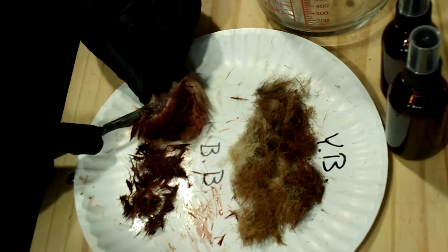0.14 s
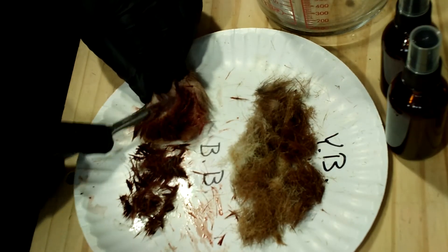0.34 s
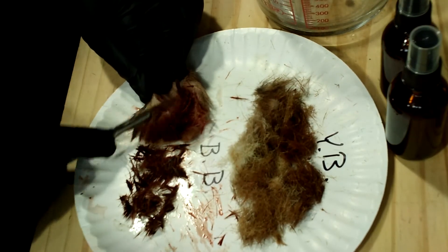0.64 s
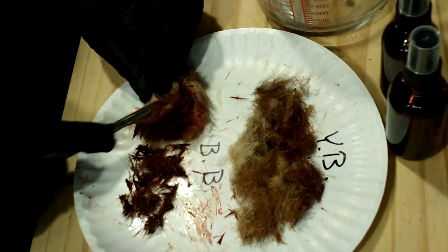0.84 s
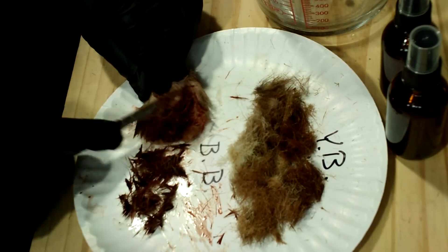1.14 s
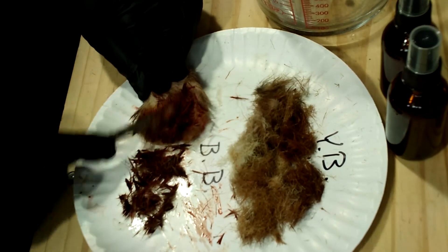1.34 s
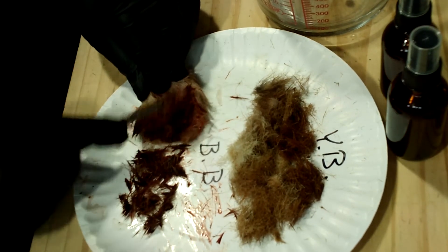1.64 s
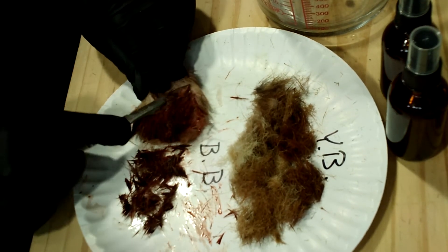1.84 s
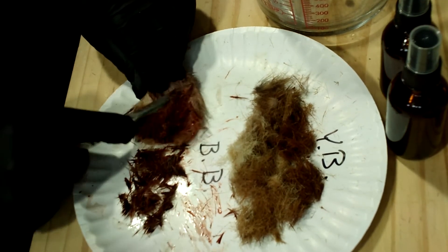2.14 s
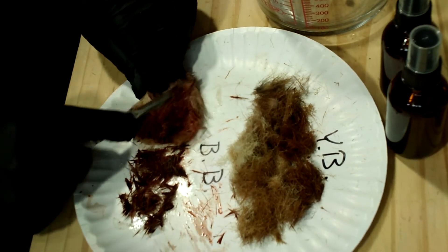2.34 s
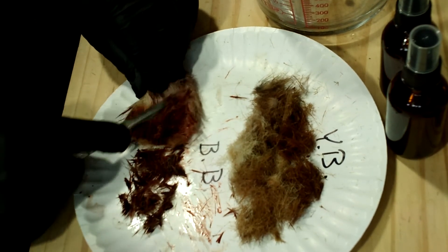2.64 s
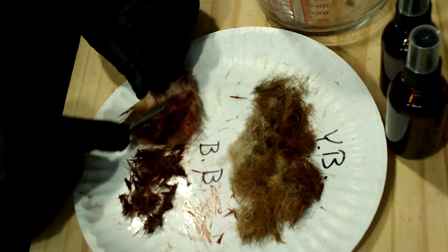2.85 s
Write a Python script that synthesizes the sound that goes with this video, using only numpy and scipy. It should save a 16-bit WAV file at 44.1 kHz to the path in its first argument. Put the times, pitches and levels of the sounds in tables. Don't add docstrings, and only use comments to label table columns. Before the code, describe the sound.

A small blade scrapes through damp hair over a paper plate, ten quick crisp strokes at a steady pace, with tiny snaps and rustles between them; close microphone, small quiet room, low hum and faint hiss.

```python
import sys
import numpy as np
from scipy import signal
from scipy.fft import rfft, irfft, next_fast_len
from scipy.io import wavfile
from scipy.ndimage import map_coordinates

SR = 44100
rng = np.random.default_rng(int(sys.argv[2]) if len(sys.argv) > 2 else 0)


def master_out(mix):
    frames = np.transpose(np.atleast_2d(mix))
    ceiling = np.clip(frames, -1, 1)
    pcm = np.round(ceiling * 32767).astype(np.int16)
    wavfile.write(sys.argv[1], SR, pcm)


def to_linear_factor(level_db):
    exponent = np.asarray(level_db, float) / 20
    return 10 ** exponent


N = 132300
T = np.arange(N) / SR


def unit(x):
    return x / np.sqrt(np.mean(x ** 2) + 1e-20)


def wobble(rate_hz):
    knots = rng.standard_normal(int(N * rate_hz / SR) + 4)
    return map_coordinates(knots, [T * rate_hz])


def gain(points, hz):
    f, db = np.transpose(points)
    f = np.r_[f[0] / 2, f, f[-1] * 2]
    db = np.r_[db[0] - 40, db, db[-1] - 40]
    return to_linear_factor(np.interp(np.log(hz + 1), np.log(f), db))


def peaks(rows, hz):
    return sum(to_linear_factor(db) / (1 + (2 * (hz - centre) / width) ** 2) for centre, width, db in rows)


def coloured(x, size_of):
    m = 2 * next_fast_len(N // 2 + 4096)
    size = size_of(np.fft.rfftfreq(m, 1 / SR))
    cepstrum = irfft(np.log(size + 1e-6), m)
    cepstrum[1:m // 2] *= 2
    cepstrum[m // 2 + 1:] = 0
    y = irfft(rfft(x, m) * np.exp(rfft(cepstrum)), m)[:N]
    return y / np.sqrt(np.mean(size ** 2))


# (frequency [Hz], density [dB per Hz])
HUM_SPECTRUM = [(12, -15.5), (20, -0.5), (66, 0), (382, -16.5), (458, -19.5), (608, -22.5), (686, -23),
                (1010, -26.5), (2500, -35), (3250, -60), (5500, -120)]
# (frequency [Hz], density [dB per Hz])
HISS_SPECTRUM = [(1200, -22.5), (2500, -7), (4000, -5.5), (4850, 3), (5800, -7.5), (9000, -9), (15500, -11)]
HUM_DB, HISS_DB = -56.5, -68.5
WHINE_HZ, FLIPS_PER_S, FIRST_FLIP_S, WHINE_DB = 7867.13, 59.94, .0086, -77.5


def room():
    hum_level = to_linear_factor(HUM_DB + 1.0 * wobble(3.04))
    hum = hum_level * coloured(rng.standard_normal(N), lambda hz: gain(HUM_SPECTRUM, hz))
    hiss = to_linear_factor(HISS_DB) * coloured(rng.standard_normal(N), lambda hz: gain(HISS_SPECTRUM, hz))
    flip = np.clip(8 * np.sin(np.pi * FLIPS_PER_S * (T - FIRST_FLIP_S)), -1, 1)
    whine = np.sqrt(2) * to_linear_factor(WHINE_DB) * flip * np.sin(2 * np.pi * WHINE_HZ * T)
    return hum + hiss + whine


def walls(x):
    t = T[:SR // 4]
    tail = rng.standard_normal(len(t)) * to_linear_factor(-60 * t / 0.16)
    echo = np.pad(tail / np.linalg.norm(tail), (150, 0))
    return to_linear_factor(-15) * signal.fftconvolve(x, echo)[:N]


# (start [s], length [s], level [dB])
HAND_RUSTLES = [(0.1, 0.046, -66), (0.216, 0.027, -53), (0.368, 0.044, -58), (0.451, 0.064, -58),
                (1.487, 0.072, -62), (2.18, 0.01, -58.5), (2.347, .017, -48.5), (0.21, 0.04, -64),
                (0.94, .025, -70), (0.69, 0.035, -66), (1.18, 0.019, -66), (0.55, 0.014, -55),
                (2.618, 0.0092, -78), (2.875, .02, -56), (1.332, 0.064, -50), (2.304, 0.04, -55),
                (2.036, 0.023, -60), (1.4, 0.0086, -47), (1.865, 0.056, -62), (2.5, 0.023, -51),
                (1.545, 0.025, -63), (2.905, 0.0068, -46), (2.975, 0.045, -69)]


def rustling():
    return sum(to_linear_factor(db) * np.sin(np.pi * np.clip((T - s) / life_s, 0, 1)) for s, life_s, db in HAND_RUSTLES)


def crumbles(rows, life_s):
    shape = 0
    for s, db in rows:
        fall_db = 13 * np.clip((T - s) / life_s, 0, 9) ** 2
        shape = shape + to_linear_factor(db - fall_db) * (T >= s)
    return shape * rng.standard_normal(N)


# (time [s], peak [dB])
STRAY_TICKS = [(.200, -48), (.3985, -47), (.455, -47), (.482, -46), (.6496, -50), (1.064, -47),
               (1.5418, -33), (1.603, -48), (1.8945, -47), (2.211, -47), (2.3385, -46), (2.490, -45),
               (2.8973, -39), (2.9464, -50)]


def stray_ticks():
    return to_linear_factor(-7) * crumbles(STRAY_TICKS, .0011)


# (time [s], peak [dB])
THICK_STRANDS = [(0.5292, -23.5), (1.106, -24), (1.379, -31), (1.6566, -25), (1.6835, -26.5), (1.694, -33),
                 (1.9868, -36), (2.0028, -29), (2.017, -36), (2.0313, -15), (2.03, -35), (2.2638, -18.5),
                 (2.2775, -30), (2.2924, -20), (2.522, -31), (2.597, -25), (2.609, -31), (2.7703, -31.5),
                 (2.803, -33), (2.8114, -30)]


def thick_strands():
    return to_linear_factor(-6.5) * crumbles(THICK_STRANDS, .0023)


# (frequency [Hz], density [dB per Hz])
THUD_SPECTRUM = [(200, -42.5), (450, 1.5), (900, -1), (2200, 0), (3500, -17.5), (6000, -43.5)]
# (frequency [Hz], width [Hz], gain [dB])
PLATE_MODES = [(520, 30, -2.1), (882, 48, -4.2), (1440, 33, -0.3), (2200, 74, 0.54)]


def plate_thud(x):
    return coloured(x, lambda hz: gain(THUD_SPECTRUM, hz) * (1 + peaks(PLATE_MODES, hz)))


# (frequency [Hz], density [dB per Hz])
FIZZ_SPECTRUM = [(6900, -29), (7600, -26), (9000, -29.5), (10000, -34.5), (10600, -27.5), (11200, -33.5),
                 (12200, -37), (15000, -46)]


def fine_fizz(x):
    return to_linear_factor(-19.5) * coloured(x, lambda hz: gain(FIZZ_SPECTRUM, hz))


# (frequency [Hz], width [Hz], level [dB])
BLADE_MODES = [(4415, 97, -11.5), (4708, 266, 1), (4920, 256, 0.5), (5270, 220, -11.5)]
SHIFT_DB, SHIFT_RATE_HZ = 3.2, 170


def blade_ring(x):
    ring = 0
    for centre_hz, width_hz, db in BLADE_MODES:
        drive = x * to_linear_factor(SHIFT_DB * np.tanh(wobble(SHIFT_RATE_HZ)))
        ring = ring + to_linear_factor(db) * coloured(drive, lambda hz: peaks([(centre_hz, width_hz, 0)], hz))
    return to_linear_factor(-7) * ring


# (frequency [Hz], density [dB per Hz])
SCRAPE_SPECTRUM = [(1800, -17.5), (3000, -9.5), (3400, -6), (4400, 1.5), (5300, -1.5), (6300, -2.5),
                   (6900, -12.5), (8000, -36)]
# (frequency [Hz], width [Hz], gain [dB])
SCRAPE_RINGS = [(3505, 27, 4.5), (3880, 70, -6), (4140, 72, -8), (5030, 140, -48), (6000, 57, -6)]


def blade_scrape(x):
    return to_linear_factor(-5) * coloured(x, lambda hz: gain(SCRAPE_SPECTRUM, hz) * (1 + peaks(SCRAPE_RINGS, hz)))


SNAP_RATE_HZ, SNAP_SPREAD_DB = 4000, 4
RAREST_SHARE = .12
CLUMP_DB, CLUMP_RATE_HZ, SURGE_DB, SURGE_RATE_HZ = 4, 380, .6, 50


def swarm(rub_db):
    when, size, sign = rng.random((3, N))
    size_db = -SNAP_SPREAD_DB * np.log(np.maximum(size, RAREST_SHARE))
    snaps = (when < SNAP_RATE_HZ / SR) * to_linear_factor(size_db) * np.sign(sign - .5)
    clump_db = CLUMP_DB * np.tanh(wobble(CLUMP_RATE_HZ))
    surge_db = SURGE_DB * np.tanh(wobble(SURGE_RATE_HZ))
    clumps = to_linear_factor(clump_db + surge_db)
    rub = clumps * rng.standard_normal((2, N))
    return [unit(clumps * unit(snaps) + to_linear_factor(db) * r) for db, r in zip(rub_db, rub)]


APPROACH_S, APPROACH_DB, ATTACK_S = .03, -23, .002
RELEASE_S, BRUSH_DB = .0097, -29
HOLD_S = .012


def stroke(bite, deep, leave, ease_db, bite_db, brush_db):
    s = [bite - APPROACH_S, bite - ATTACK_S, bite, deep - HOLD_S, deep + HOLD_S,
         leave, leave + RELEASE_S, leave + 4 * RELEASE_S]
    db = [APPROACH_DB - 4 + brush_db, APPROACH_DB + brush_db, bite_db, 0, 0,
          ease_db, BRUSH_DB + brush_db, BRUSH_DB - 5 + brush_db]
    return np.interp(T, s, db, left=-99, right=-99)


# (blade bites [s], deepest [s], blade leaves [s])
STROKE_TIMES = [
    (.243, .282, .316),
    (.510, .548, .613),
    (.798, .845, .910),
    (1.083, 1.122, 1.183),
    (1.358, 1.388, 1.455),
    (1.630, 1.668, 1.762),
    (1.926, 1.95, 2.04),
    (2.223, 2.28, 2.303),
    (2.496, 2.528, 2.622),
    (2.769, 2.812, 2.878),
]
# (deepest level [dB], bite re deepest [dB], leaving re deepest [dB])
STROKE_FORCE = [(-50.5, -8.5, -5), (-38.5, -6.5, -11.5), (-40.5, -6, -7.5), (-36, -9, -11.5),
                (-39.5, -21, -9), (-39, -10, -16.5), (-49.5, 2.5, -1.5), (-41.5, -4.5, -3.5),
                (-38, -12, -13.5), (-38, -5, -14)]
# (plate thud [dB], fine fizz [dB], blade ring [dB])
STROKE_GRIP = [(-16, 10, 3.5), (-18.5, 2, -9.5), (-17.5, 3, -3.5), (-19.5, 0, -6.5), (-16.5, 0, -10.5),
               (-20, -3, -4.5), (-21, 2, 4.5), (-20, 1.5, 4.5), (-21, 1, 1.5), (-20.5, 0.5, -0.5)]


def knife():
    scrape = ring = fizz = thud = 0
    for times, (db, bite_db, ease_db), (thud_db, fizz_db, ring_db) in zip(STROKE_TIMES, STROKE_FORCE, STROKE_GRIP):
        scrape = scrape + to_linear_factor(db + stroke(*times, ease_db, bite_db, -1))
        ring = ring + to_linear_factor(db + ring_db + stroke(*times, ease_db, bite_db, 0))
        cutting_db = stroke(*times, ease_db, bite_db, -10)
        fizz = fizz + to_linear_factor(db + fizz_db + 0.8 * cutting_db)
        thud = thud + to_linear_factor(db + thud_db + cutting_db)
    fibres, fine = swarm([-2, 1.5])
    strands, ticks, rustle = thick_strands(), stray_ticks(), rustling()
    scraped = blade_scrape((scrape + to_linear_factor(-3) * rustle) * fibres + to_linear_factor(-14.5) * strands + ticks)
    rung = blade_ring((ring + rustle) * fibres + strands + ticks)
    fizzed = fine_fizz(fizz * fine + to_linear_factor(-16) * strands + to_linear_factor(3.5) * ticks)
    thudded = plate_thud(thud * fine + to_linear_factor(-30.5) * (strands + ticks))
    return scraped + rung + fizzed + thudded


def scene():
    cut = knife()
    return (cut + walls(cut) + room())[None]


def roll_off(x):
    return signal.sosfilt(signal.butter(12, 15770, fs=SR, output="sos"), x)


def record(dry):
    below_top = np.fft.rfftfreq(N, 1 / SR) < 15770
    kept = irfft(rfft(dry) * below_top, N)
    return roll_off(kept)


dry = scene()
out = record(dry)
master_out(out)
```